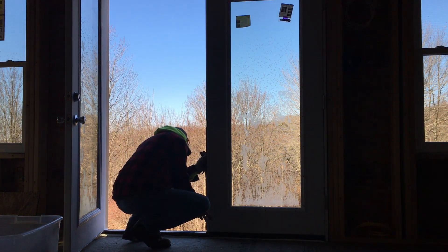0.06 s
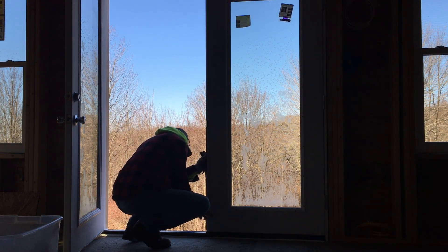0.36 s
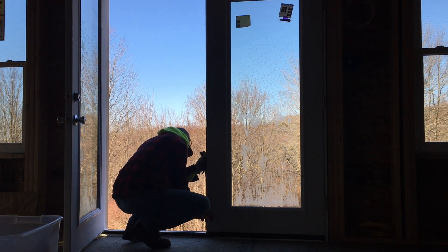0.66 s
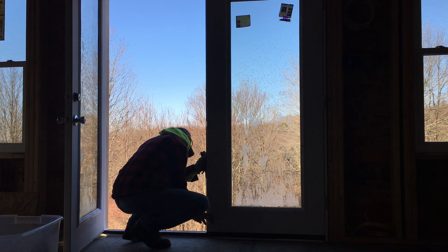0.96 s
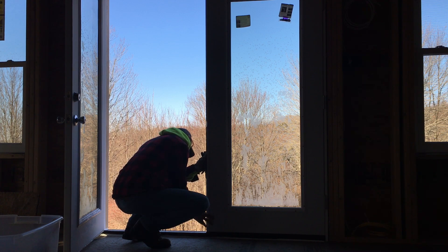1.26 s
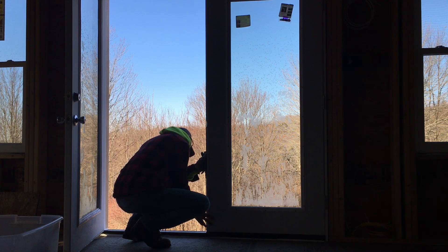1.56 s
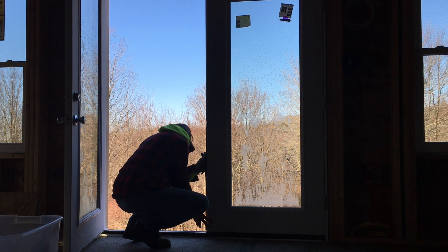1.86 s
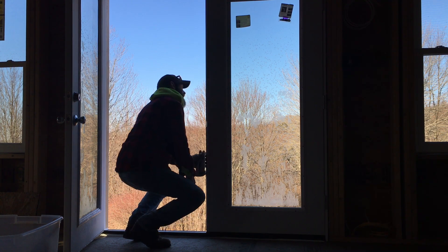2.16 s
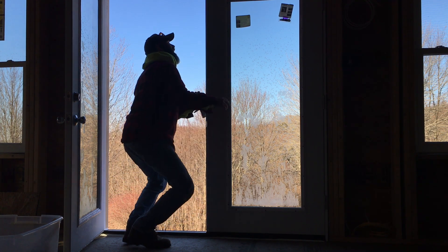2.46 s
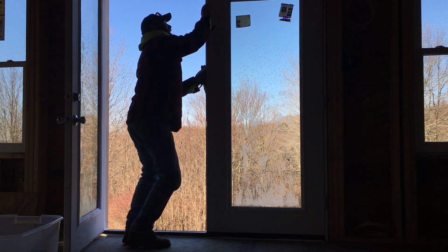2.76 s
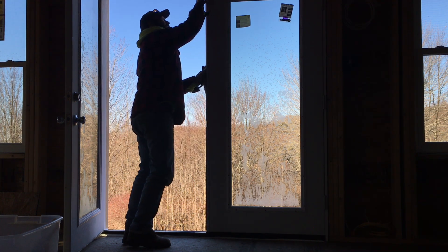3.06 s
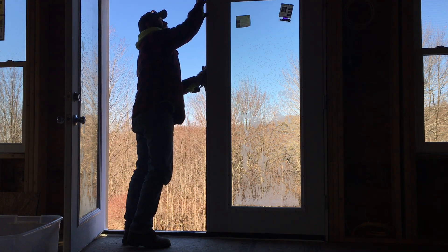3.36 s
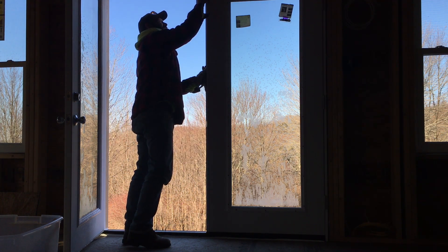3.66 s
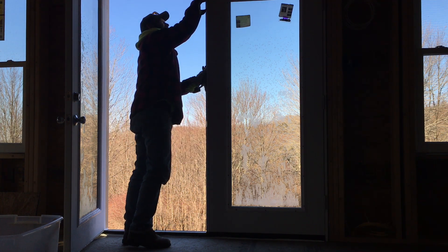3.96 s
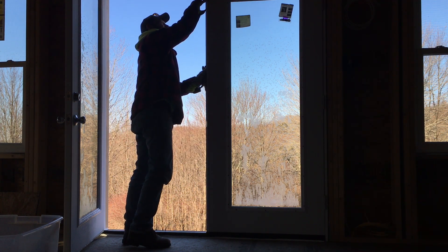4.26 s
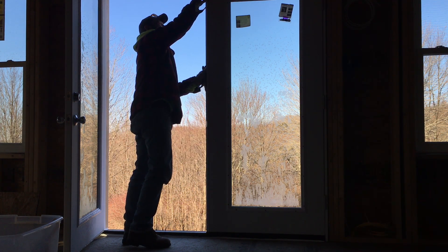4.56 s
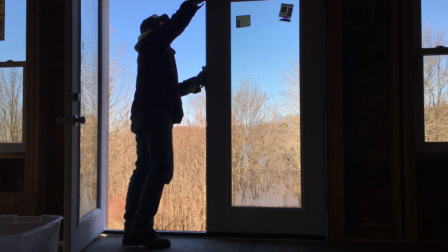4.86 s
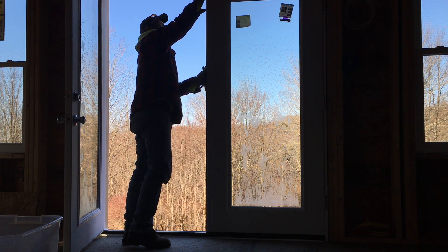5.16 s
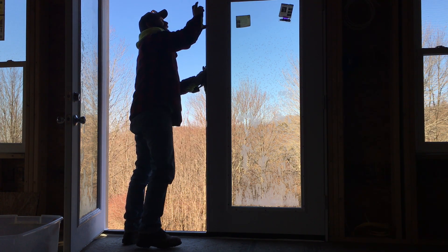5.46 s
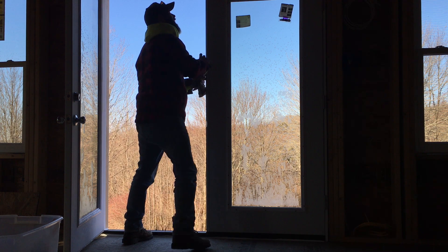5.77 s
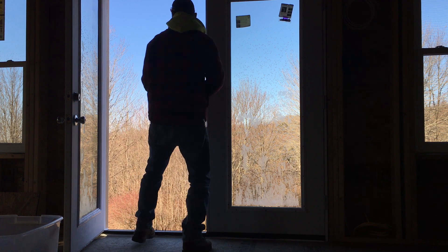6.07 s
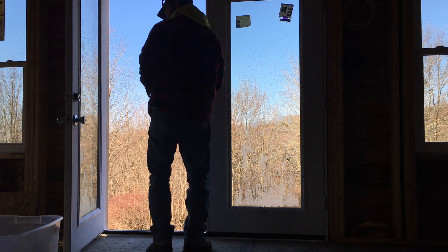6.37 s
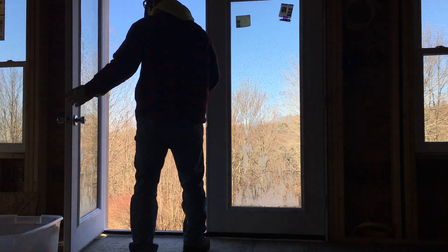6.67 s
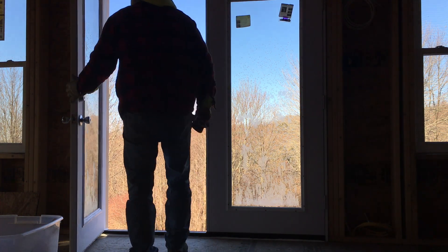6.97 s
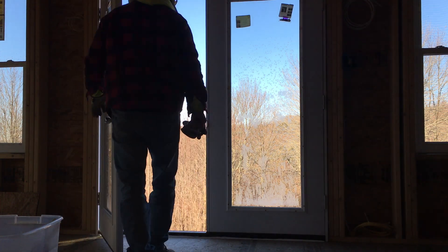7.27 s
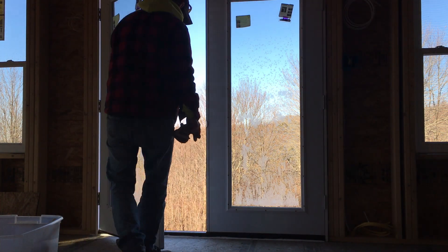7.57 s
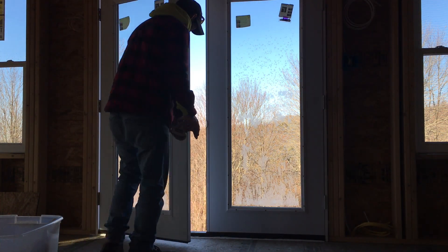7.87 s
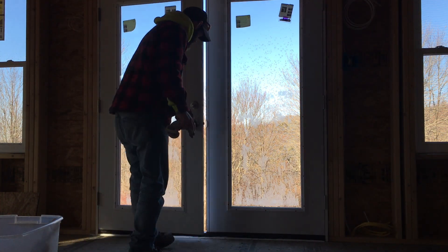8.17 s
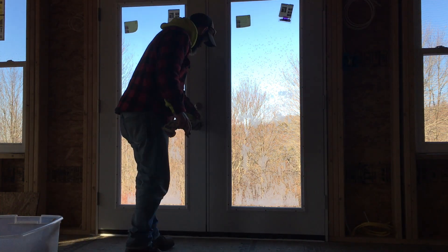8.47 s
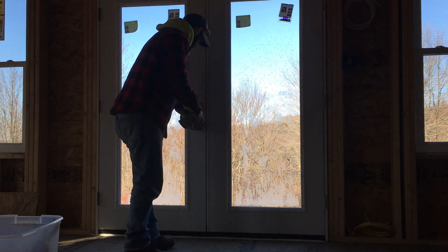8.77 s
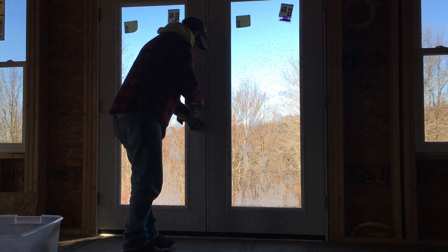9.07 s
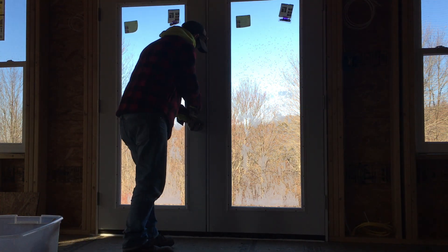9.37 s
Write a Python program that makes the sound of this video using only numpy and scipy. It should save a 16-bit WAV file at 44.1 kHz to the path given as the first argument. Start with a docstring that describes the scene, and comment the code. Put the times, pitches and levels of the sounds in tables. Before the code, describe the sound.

Metal door bolts click and snap home, boots knock on floorboards, then a patio door shuts and latches in an echoing room.

```python
"""Bolting and shutting patio doors

In a bare, timber-framed room, the bottom and top bolts of one glazed door snap home, ringing the
metal and shaking the door. Boots knock on the floorboards, then the other door rubs over its
weatherstrip and latches. Each blow is a short crack plus ringing tones (modes), echoed by the room.
Outside, a far engine drones over a steady rumble."""
import sys
import numpy as np
from scipy import signal
from scipy.fft import rfft, irfft
from scipy.io import wavfile

SR = 44100
rng = np.random.default_rng(int(sys.argv[2]) if len(sys.argv) > 2 else 0)


def master_out(mix):
    """Clip the mix to full scale and print it as 16-bit PCM to the path in sys.argv[1]."""
    frames = np.transpose(np.atleast_2d(mix))
    ceiling = np.clip(frames, -1, 1)
    pcm = np.round(ceiling * 32767).astype(np.int16)
    wavfile.write(sys.argv[1], SR, pcm)


N = 419832
TIME = np.arange(N) / SR
# the edges and centres of half-octave bands
EDGES_HZ = 16000 / 2 ** (np.arange(18, -1, -1) / 2)
BAND_HZ = np.sqrt(EDGES_HZ[1:] * EDGES_HZ[:-1])
# where a blow's spectrum (its balance of bass and treble) is given: (pitch [Hz])
SPECTRUM_HZ = [72, 235, 650, 1500, 3550, 9000]


def from_db(db):
    """Turn decibels into a factor to multiply by."""
    return 10 ** (np.asarray(db) / 20)


def rms_one(x):
    """Scale each row to an average level (rms) of 1."""
    return x / np.sqrt(np.mean(x ** 2, axis=-1, keepdims=True))


def unit_energy(x):
    """Scale each row to a total energy of 1."""
    return x / np.sqrt(np.sum(x ** 2, axis=-1, keepdims=True) / SR + 1e-30)


def at_hz(hz, points_hz, values):
    """Read between the points of a curve, with octaves evenly spaced."""
    return np.interp(np.log(hz), np.log(points_hz), values)


def add(out, s, sound):
    """Mix a sound in, starting at s seconds."""
    start = max(round(s * SR), 0)
    out[start:start + len(sound)] += sound[:max(N - start, 0)]


def noise_bands(size):
    """One row of separate noise for each band, all at the same level."""
    run_in = SR // 4
    filters = [signal.butter(3, band, "band", fs=SR, output="sos")
               for band in zip(EDGES_HZ, EDGES_HZ[1:])]
    bands = [signal.sosfilt(sos, rng.standard_normal(size + run_in))[run_in:] for sos in filters]
    return rms_one(np.array(bands))


def pulse(gain_db):
    """A pulse with this spectrum and all its energy as early as it can come (minimum phase)."""
    cepstrum = irfft(np.log(from_db(gain_db) + 1e-9))
    cepstrum[1:len(cepstrum) // 2] *= 2
    cepstrum[len(cepstrum) // 2 + 1:] = 0
    return irfft(np.exp(rfft(cepstrum)))


def outdoor_air(level_db=-56.28):
    """Steady outdoor rumble and faint hiss."""
    # the background's spectrum: (pitch [Hz], relative level [dB])
    spectrum = [(15, -33), (25, -21), (43, -1), (92, 1), (114, -10.5), (344, -15.5), (416, -21),
                (451, -21.5), (641, -21), (911, -21), (1130, -21.5), (1650, -27.5), (5000, -36.5),
                (12200, -40.5), (16000, -44.5)]
    hz = np.maximum(np.arange(N // 2 + 1) * SR / N, 1)
    gain = from_db(at_hz(hz, *np.transpose(spectrum)))
    noise = irfft(rfft(rng.standard_normal(N)) * gain, N)
    return from_db(level_db) * rms_one(noise)


def far_engine(waver_db=-0.3, wavers_per_s=6, shutting_s=(8.46, 8.9)):
    """Only low overtones carry this far, wavering on the way; shutting the door shifts their balance."""
    # how the engine runs: (time [s], firing rate [Hz], level [dB])
    running = [(0, 43.85, -68.5), (3.5, 43.22, -72), (5.6, 43.47, -53.5), (7.3, 43.05, -48.5),
               (8.1, 43.4, -49), (9.0, 41.55, -51.5), (9.52, 41.6, -52)]
    # what reaches the room: (multiple of the firing rate, door open [dB], door shut [dB])
    overtones = [(2, 0, -25), (3, -11, -4.5), (4, -18.5, -3.5)]
    s, rate_hz, level_db = np.transpose(running)
    phase = 2 * np.pi * np.cumsum(np.interp(TIME, s, rate_hz)) / SR
    engine_db = np.interp(TIME, s, level_db)
    out = np.zeros(N)
    for multiple, open_db, shut_db in overtones:
        waver = np.interp(TIME * wavers_per_s, np.arange(SR), rng.standard_normal(SR))
        doorway_db = np.interp(TIME, shutting_s, [open_db, shut_db])
        out += np.sqrt(2) * np.sin(multiple * phase) * from_db(engine_db + doorway_db + waver_db * waver)
    return out


def room_echo(x, build_up_s=0.0019, first_echo_s=0.0063):
    """Dense echoes from studs and boards build up after the direct sound; the treble dies first."""
    # the room's echo: (pitch [Hz], time to fade by 60 dB [s], gain [dB])
    echo_bands = [(70, 1.3, 3.5), (235, 0.95, 4), (654, 1.02, 2), (1400, 0.88, 2.5), (3380, 0.61, 0),
                  (5630, 0.51, -5), (8800, 0.37, -2), (14740, 0.36, -8.5)]
    hz, fade_s, gain_db = np.transpose(echo_bands)
    t = np.maximum(TIME[:3 * SR // 2] - first_echo_s, 0)
    rise = 1 - np.exp(-t / build_up_s)
    decay = from_db(-60 * t / at_hz(BAND_HZ, hz, fade_s)[:, None])
    gain = from_db(at_hz(BAND_HZ, hz, gain_db)) * np.sqrt(2 * np.diff(EDGES_HZ)) / SR
    echoes = gain @ unit_energy(noise_bands(len(t)) * rise * decay)
    return signal.fftconvolve(x, echoes)[:N]


def rubbing(swell_db=16, grain_db=3, slips_per_s=600):
    """Bolts, latch, weatherstrip and sleeves rub in tiny slips, harder and harder until they stop."""
    # the rubs of each material: (start [s], end [s], final level [dB])
    metal = [(0.928, 0.935, -27), (1.518, 1.547, -40), (4.8145, 4.821, -28), (4.985, 4.997, -24),
             (7.27, 7.34, -54), (8.421, 8.48, -39)]
    weatherstrip = [(7.852, 8.11, -61), (8.125, 8.4, -49.5)]
    sleeves = [(3.945, 4.013, -65), (4.292, 4.343, -72.5), (4.64, 4.7, -70), (6.294, 6.47, -64),
               (7.17, 7.23, -62.5)]
    out, noise = np.zeros(N), noise_bands(SR)
    materials = [(metal, 3200, 2.26), (weatherstrip, 2400, 0.86), (sleeves, 4200, 3.5)]
    for rubs, centre_hz, width_octaves in materials:
        hiss = rms_one(np.exp(-.5 * (np.log2(BAND_HZ / centre_hz) / width_octaves) ** 2) @ noise)
        for start, end, level_db in rubs:
            size = int(np.clip((end - start) * SR, 2, SR))
            slips = np.interp(TIME[:size] * slips_per_s, np.arange(SR), rng.standard_normal(SR))
            envelope = from_db(level_db + np.linspace(-swell_db, 0, size) + grain_db * slips)
            add(out, start, hiss[:size] * envelope)
    return out + room_echo(out)


def strike(touch, s, strength_db, weight_db=0, edge_db=0, ring_db=0, focus_hz=None):
    """Describe one blow: weight adds bass, a hard edge adds treble, and harder blows are shorter."""
    weight_hz, edge_hz, firm_db, shortening = 337, 3700, -53.5, 0.15
    shape_db, base_ms, echo_db = touch
    hz = np.array(SPECTRUM_HZ)
    bass_db = weight_db / (1 + (hz / weight_hz) ** 2)
    treble_db = edge_db / (1 + (edge_hz / hz) ** 2)
    spectrum_db = strength_db + np.array(shape_db) + bass_db + treble_db
    length_ms = base_ms * from_db(-shortening * (strength_db + edge_db - firm_db))
    return s, spectrum_db, max(length_ms, .5), echo_db, ring_db, focus_hz


def contact_crack(noise, spectrum_db, length_ms, settle_cycles, top_db, rise_cycles=2.2):
    """A short crack; heavy wood takes a few cycles to move and settle, so the bass comes later."""
    t, hz = TIME[:noise.shape[1]], BAND_HZ[:, None]
    rise = (1 - np.exp(-t * hz / rise_cycles)) ** 2
    decay = np.exp(-t / (length_ms / 1000 + settle_cycles / hz))
    roll_off_db = at_hz(BAND_HZ, [37, 53, 9500, 13500], [-12, 0, 0, top_db])
    gain = from_db(at_hz(BAND_HZ, SPECTRUM_HZ, spectrum_db) + roll_off_db)
    return gain @ unit_energy(noise * rise * decay) / np.sqrt(2)


def contact_click(spectrum_db, top_db):
    """The blow as one clean pulse with the given energy per octave."""
    hz = np.linspace(1, SR / 2, SR // 10 + 1)
    roll_off_db = at_hz(hz, [20, 53, 9500, 13500], [-35, 0, 0, top_db])
    octave_width_db = 10 * np.log10(2 * np.log(2) * hz)
    return SR * pulse(at_hz(hz, SPECTRUM_HZ, spectrum_db) + roll_off_db - octave_width_db)


def ringing(modes, spectrum_db, focus_hz, focus_db=9, focus_octaves=0.12):
    """Each mode is a dying tone of varying strength; where a blow lands can favour those near a pitch."""
    hz, level_db, fade_s = np.transpose(modes)
    if focus_hz is not None:
        level_db += focus_db * np.exp(-.5 * (np.log2(hz / focus_hz) / focus_octaves) ** 2)
    t = TIME[:SR]
    tones = unit_energy(np.sin(2 * np.pi * hz[:, None] * t) * from_db(-60 * t / fade_s[:, None]))
    gain = from_db(level_db + at_hz(hz, SPECTRUM_HZ, spectrum_db) + rng.standard_normal(len(hz)))
    return (gain * rng.choice([-1, 1], len(hz))) @ tones


def blows(hits, modes, settle_cycles, top_db, ring_db, echo_db, ring_echo_db):
    """Blows on one object crack and ring, heard directly and through the room."""
    click_echo_db, crack_echo_db = -1.26, -8
    direct, to_room = np.zeros(N), np.zeros(N)
    bursts = np.split(noise_bands(SR // 5 * len(hits)), len(hits), axis=1)
    for noise, (s, spectrum_db, length_ms, hit_echo_db, hit_ring_db, focus_hz) in zip(bursts, hits):
        ring = from_db(ring_db + hit_ring_db) * ringing(modes, spectrum_db, focus_hz)
        crack = contact_crack(noise, spectrum_db, length_ms, settle_cycles, top_db)
        add(direct, s, crack)
        add(direct, s, ring)
        # the room gets a clean click plus the uneven crack, which gives each blow its own colour
        add(to_room, s, from_db(hit_echo_db + click_echo_db) * contact_click(spectrum_db, top_db))
        add(to_room, s, from_db(hit_echo_db + crack_echo_db) * crack)
        add(to_room, s, from_db(ring_echo_db) * ring)
    return direct + room_echo(from_db(echo_db) * to_room)


def boots():
    """Heels and soles land and set the floorboards ringing."""
    # the boards' tones: (pitch [Hz], level [dB], time to fade by 60 dB [s])
    floor_modes = [(131, -10, 0.33), (252.8, -2.5, 0.72), (305, -7.5, 0.3), (372, -15, 0.36)]
    # boot on wood: (levels at SPECTRUM_HZ [dB], base length [ms], echo [dB])
    touch = ([2.5, 12.5, 1.5, -2, -11, -17.5], 3.6, -2.2)
    # each landing: (time [s], strength [dB], weight [dB], edge [dB])
    steps = [(2.928, -83, -12, 8), (5.847, -81.5, 4.5, -14), (5.918, -70, -10.5, 3), (6.021, -84.5, 17, 10),
             (6.586, -66, 1.5, 3), (6.622, -71.5, 3, 14.5), (6.7856, -67.5, 0, -8), (7.4138, -63, -13, -18),
             (7.489, -75, 7.5, 3), (8.33, -70, -3.5, -4)]
    hits = [strike(touch, *step) for step in steps]
    return blows(hits, floor_modes, settle_cycles=0.55, top_db=-6,
                 ring_db=-6, echo_db=3.5, ring_echo_db=-4)


def closing_door():
    """The door is pulled round, the latch rides over its plate and drops in, the door thuds shut."""
    # the shut door's tones: (pitch [Hz], level [dB], time to fade by 60 dB [s])
    door_modes = [(48.4, 1.5, 0.9), (61, -4.5, 0.77), (106, -4, 0.5), (145, -10, 1), (243.5, -12.5, 0.6),
                  (297.2, -4, 0.31)]
    # a knock on the door: (levels at SPECTRUM_HZ [dB], base length [ms], echo [dB])
    touch = ([0.5, -0.5, -2.5, 0.5, 2, -1.5], 2.6, -0.3)
    # the knob is gripped; the door meets the weatherstrip, latches, settles and is tried:
    # (time [s], strength [dB], weight [dB], edge [dB])
    knocks = [(7.284, -73, -8, -7), (7.391, -85, 17, 18), (8.103, -61.5, -6.5, -21),
              (8.3939, -57.5, -2.5, 10.5), (8.413, -63, 12, 11.5), (8.47, -51.5, -4, 0.5),
              (8.496, -68.5, 21.5, 19), (8.555, -71, 20.5, -9), (8.705, -72.5, 9, -5.5),
              (8.972, -81, 7, -2), (9.4937, -70.5, 6, -1)]
    hits = [strike(touch, *knock) for knock in knocks]
    return blows(hits, door_modes, settle_cycles=3.8, top_db=-15,
                 ring_db=6.5, echo_db=2.07, ring_echo_db=-12)


def bolts(top_from_s=2.5):
    """The bottom bolt is worked first, then the top one; both shake the same door."""
    # tones of the door, the bolts and the hollow channels they run in (these die quickly):
    # (pitch [Hz], level [dB], time to fade by 60 dB [s])
    door_modes = [(54, -14.5, 0.72), (86, -10.5, 0.72), (106.2, -9, 0.84), (190.6, -9, 0.77),
                  (234.5, -2.5, 0.8), (295.5, 2, 0.19), (335, -7, 0.57), (406, -11, 0.23), (442, -1, 0.41),
                  (527, 0.5, 0.3), (618, -6.5, 0.28)]
    bottom_bolt = [(1060, -5, 0.5), (2290, -10, .35), (2420, -8, .4), (2585, -11, 0.35), (2710, -10, 0.35),
                   (2880, -13, .25), (4340, -10.5, 0.47), (4500, -16, 0.41)]
    top_bolt = [(1120, -15, .12), (1400, 1.5, 0.25), (1446, -7, 0.2), (1530, -2.5, 0.52),
                (1610, -6.5, 0.34), (2380, -1, 0.15), (2671, -7, 0.21), (2724, 0.5, 0.2), (2700, -8, 0.32),
                (3000, -16, 0.49)]
    bottom_channel = [(970, -1, 0.013), (2540, -3.5, 0.019)]
    top_channel = [(1474, -1, .03), (2630, 0, 0.01)]
    # three kinds of contact: (levels at SPECTRUM_HZ [dB], base length [ms], echo [dB])
    throw_touch = ([5, 7.5, -0.5, 0.5, -1, -3.5], 2.5, 0)
    snap_touch = ([-8.5, -6.5, 1.5, 0, 1, 2], 3.8, 0)
    tick_touch = ([-11.5, -2, -1.5, -0.5, -1.5, -6], 2.6, -1)
    # a bolt shoots home: (time [s], strength [dB], edge [dB], ring [dB])
    throws = [(0.934, -48.5, -7.5, 2), (4.822, -48, 4.5, 6)]
    # its lever snaps flat: (time [s], strength [dB], weight [dB], ring [dB], favoured pitch [Hz])
    snaps = [(1.5454, -51, 1, -5.5, 4400), (4.9952, -44.5, -9.5, -11, 1105)]
    # fingers work the bolts:
    # (time [s], strength [dB], weight [dB], edge [dB], ring [dB], favoured pitch [Hz])
    ticks = [(0.072, -80.5, 4, -7, 3.5, 4400), (0.431, -85.5, -12, 4, 2, 4400),
             (0.6219, -60, -20, -8, 2, 2620), (1.2507, -63.5, -8, -9.5, -5, 1050),
             (1.871, -71, 2, -3, 2, 2370), (2.151, -85, -13, 7, -3, 1024), (3.7242, -91.5, 3, 10, -2, 2700),
             (4.008, -87.5, 14, 15, -6, 2500), (4.076, -80.5, 3, -2, -1, 1350),
             (4.341, -89, 0, 4, -7.5, 1380)]
    hits = [strike(throw_touch, s, db, edge_db=edge, ring_db=ring) for s, db, edge, ring in throws]
    hits += [strike(snap_touch, s, db, weight_db=weight, ring_db=ring, focus_hz=hz)
             for s, db, weight, ring, hz in snaps]
    hits += [strike(tick_touch, *tick) for tick in ticks]
    bottom_hits = [hit for hit in hits if hit[0] < top_from_s]
    top_hits = [hit for hit in hits if hit[0] >= top_from_s]
    bottom = blows(bottom_hits, door_modes + bottom_bolt + bottom_channel, settle_cycles=2.6,
                   top_db=-21, ring_db=-5, echo_db=-1.1, ring_echo_db=-4.5)
    top = blows(top_hits, door_modes + top_bolt + top_channel, settle_cycles=2.1,
                top_db=-24, ring_db=-5, echo_db=1.16, ring_echo_db=-6)
    return bottom + top


def scene():
    """All the indoor sounds share one tone colour; engine and air lie under them."""
    # peaks and dips in what the doors and room give off: (pitch [Hz], gain [dB])
    colour = [(200, -1.5), (310, 2), (480, -2.5), (750, 1), (1450, 0.5), (2000, -3), (2700, -3.5),
              (4300, -1.5), (5200, -3.5), (8700, -2.5), (10700, -6), (12500, 5)]
    hz = np.linspace(1, SR / 2, SR // 20 + 1)
    colour_filter = pulse(at_hz(hz, *np.transpose(colour)))
    indoors = bolts() + boots() + closing_door() + rubbing()
    indoors = signal.fftconvolve(indoors, colour_filter)[:N]
    return (indoors + far_engine() + outdoor_air())[None]


def record(dry, low_hz=36, high_hz=15800):
    """Take out the deepest bass and cut the highest treble steeply."""
    bass_cut = signal.butter(4, low_hz, "high", fs=SR, output="sos")
    treble_cut = signal.ellip(10, .1, 80, high_hz, fs=SR, output="sos")
    return signal.sosfilt(treble_cut, signal.sosfilt(bass_cut, dry))


dry = scene()
out = record(dry)
master_out(out)
```